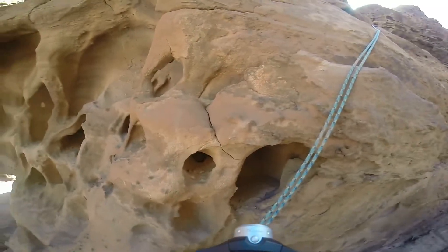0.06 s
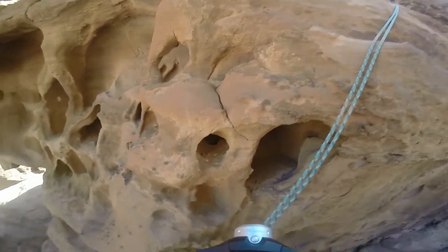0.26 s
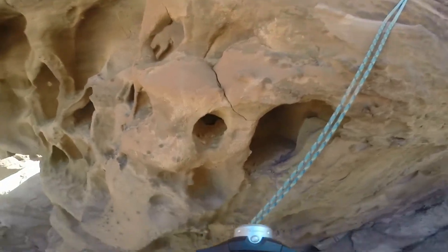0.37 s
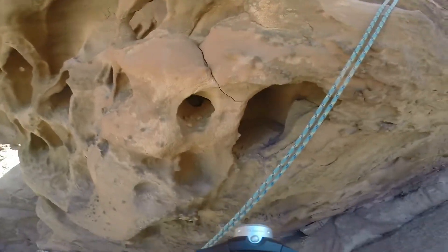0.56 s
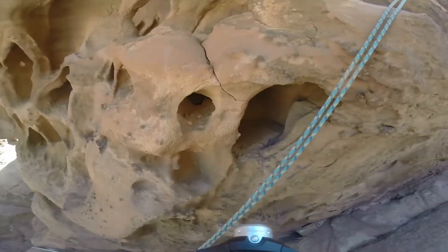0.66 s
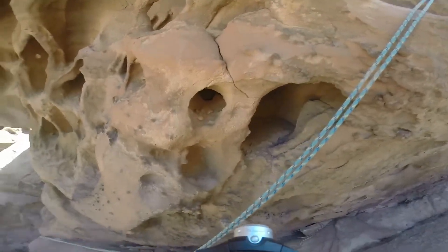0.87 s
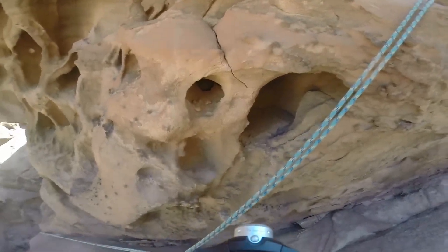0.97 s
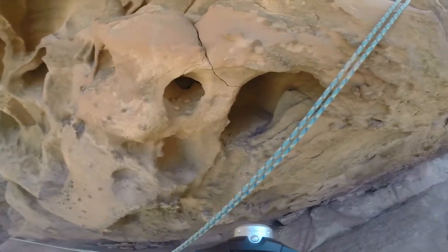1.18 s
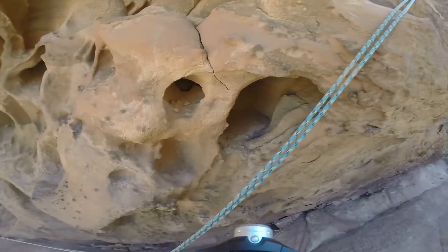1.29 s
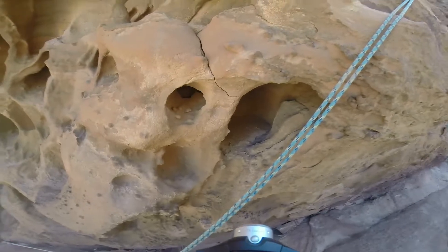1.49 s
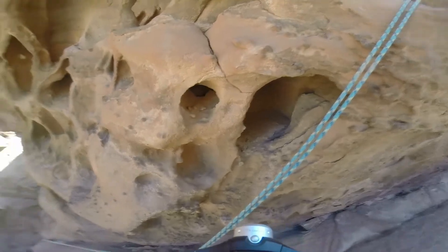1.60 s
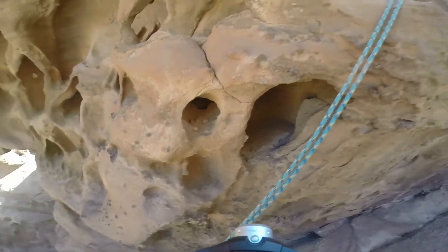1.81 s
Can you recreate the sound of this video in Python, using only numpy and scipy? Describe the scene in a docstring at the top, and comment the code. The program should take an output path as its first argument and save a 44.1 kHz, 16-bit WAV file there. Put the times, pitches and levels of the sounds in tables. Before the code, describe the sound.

Sharp plastic clacks from gear bumping a camera mount, over gritty cloth rubbing and low handling thuds

```python
"""Three chattering knocks of gear on a camera's plastic housing, plus four lone contacts, on a rock face.
Each contact rings modes of the housing, cracks as decaying noise and thumps the mount; jolts add swings.
Between them rope and clothing rub: clumped grains, hissing scrapes, gritty ticks and a short wavering hum.
Soft bumps and a muffled rumble of the swaying mount are shaped low noise, over a faint floor of air."""
import sys
import numpy as np
from scipy import signal
from scipy.fft import rfft, irfft, next_fast_len
from scipy.io import wavfile
from scipy.ndimage import uniform_filter1d, map_coordinates

SR = 44100
rng = np.random.default_rng(int(sys.argv[2]) if len(sys.argv) > 2 else 0)


def digitize_waveform(pressure):
    """Quantize a signal to 16-bit integers and store it at the path in sys.argv[1].

    Rows of a 2-D input are taken as channels; values are limited to [-1, 1].
    """
    field = np.atleast_2d(pressure).T
    bounded = np.clip(field, -1, 1)
    quanta = np.round(bounded * 32767).astype(np.int16)
    wavfile.write(sys.argv[1], SR, quanta)


N = 81585


def amp(db):
    """Decibels to gain."""
    return 10 ** (np.asarray(db) / 20)


def unit(x):
    """Scale to rms 1."""
    return x / np.sqrt(np.mean(x ** 2) + 1e-20)


def noise():
    """White noise, rms about 1."""
    return rng.standard_normal(N)


def level(rows):
    """Gain per sample, interpolated in dB between (time [s], level [dB]) rows."""
    time_s, level_db = np.transpose(rows)
    return amp(np.interp(np.arange(N) / SR, time_s, level_db))


def filtered(x, response):
    """Multiply the spectrum of x by response(hz), zero-padded against wrap-around."""
    size = next_fast_len(N + 8192)
    spectrum = rfft(x, size) * response(np.fft.rfftfreq(size, 1 / SR))
    return irfft(spectrum, size)[:N]


def coloured(x, points):
    """x shaped by (frequency [Hz], gain [dB]) points on a log frequency axis, at rms 1."""
    point_hz, point_db = np.transpose(points)
    return unit(filtered(x, lambda hz: amp(np.interp(np.log(hz + 1), np.log(point_hz), point_db))))


def since(start_s):
    """Seconds since start_s, zero before."""
    return np.maximum(np.arange(N) / SR - start_s, 0)


def ring(t, hz, t60_s):
    """One mode: a sine falling 60 dB in t60_s."""
    return np.sin(2 * np.pi * hz * t) * amp(-60 * t / t60_s)


def swells(rows):
    """Sum of Gaussian strokes; each peaks at its time and has sigma = length / 2."""
    t = np.arange(N) / SR
    return sum(amp(db) * np.exp(-2 * ((t - peak_s) / length_s) ** 2) for peak_s, length_s, db in rows)


def wander(points_per_s):
    """Smooth random curve through normal values, points_per_s of them a second."""
    return map_coordinates(rng.standard_normal(size=2000), [np.arange(N) * points_per_s / SR])


# gear on housing: (time [s], kind, level [dB], brightness [Hz], crack [dB re level], thump [dB re level])
CONTACTS = [(0.0182, "clink", -17.5, 2250, -41, -17.5), (0.1983, "clack", -17.5, 2600, -30, -35),
            (0.2011, "clink", -19.5, 2600, -25, -7), (0.2085, "clack", -8.5, 4500, -8.5, -42),
            (0.2117, "clack", -2, 2670, -14, -10.5), (0.2156, "clack", -11.5, 2350, -34, -48),
            (0.2195, "clack", -17, 1940, -26, -46), (0.605, "tock", -36, 1670, -9, 3),
            (0.874, "clack", -35, 2360, -7, -25), (0.9687, "tock", -9, 2200, -24.5, -20.5),
            (0.9725, "tock", -27, 1870, -36, -22), (0.9761, "tock", -23.5, 1670, -31, 0.5),
            (1.292, "clack", -33.5, 2520, -13, -16.5), (1.4927, "clink", -12.5, 2580, -41, -12),
            (1.49545, "clink", -9, 4180, -9, -9.5), (1.4982, "clink", -20, 3570, -5.5, -3),
            (1.5008, "clink", -8.5, 2150, -40, -29)]
# grit catching under the rope: (time [s], level [dB])
GRIT_TICKS = [(0.067, -27), (0.086, -24.5), (0.178, -37.5), (.329, -39), (.358, -34), (.8948, -26.5),
              (0.9098, -20.5), (0.9139, -20.5), (1.001, -28), (1.062, -25), (1.108, -29.5), (1.699, -28)]
TICK_BRIGHT_HZ, TICK_CRACK_DB, TICK_THUMP_DB = 2580, -24, -17.5
# housing modes by kind, hard clack, dull tock, bright clink, gritty tick: (frequency [Hz], level [dB], t60 [s])
HOUSING_MODES = {"clack": [(483, -11.5, 0.02), (624, -20, 0.017), (737, -20.5, 0.034), (1045, -12.5, 0.019),
                 (1333, -3, 0.014), (1650, -1.5, 0.027), (1839, -12, 0.051), (2147, 0.5, 0.02),
                 (2610, -17.5, 0.047), (2846, -10, 0.019), (3156, -9.5, 0.0084), (4220, -11, 0.0067),
                 (5950, -5.5, 0.0071)], "tock": [(467, -18.5, 0.069), (1010, -0.5, 0.018), (1570, -8, 0.01),
                 (1830, -11.5, 0.029), (2080, -5, 0.0086), (2590, -6.5, 0.02), (3520, -22, 0.015)],
                 "clink": [(403, -21, 0.01), (562, -17.5, 0.023), (984, -11.5, 0.027), (1347, -8.5, 0.016),
                 (1620, -11, 0.028), (1777, -10.5, 0.022), (2217, 3.5, 0.012), (2486, -16, 0.027),
                 (3430, -17.5, 0.02), (4417, -17.5, 0.016), (5415, -9.5, 0.011)],
                 "tick": [(1290, -18.5, 0.016), (1810, -12, 0.012), (2170, 1, 0.018), (2388, -6, 0.021)]}
# crack spectrum: (frequency [Hz], gain [dB])
CRACK_COLOUR = [(200, 12.5), (1000, 6), (2500, 1.5), (3600, -9), (5500, 2.5), (8000, -15.5), (11000, -13.5),
                (15500, -46)]
CRACK_T60_S, CONTACT_ATTACK_S = 0.016, 0.00066
CRACK_CUTOFF_RATIO = 1.6  # lowpass cutoff / contact brightness
MOUNT_HZ, MOUNT_T60_S = 203.6, 0.079


def knocks():
    """Each contact excites housing modes, a noise crack and the mount; lower brightness dulls high modes."""
    out = np.zeros(N)
    grit = coloured(noise(), CRACK_COLOUR)
    ticks = [(s, "tick", db, TICK_BRIGHT_HZ, TICK_CRACK_DB, TICK_THUMP_DB) for s, db in GRIT_TICKS]
    for start_s, kind, db, bright_hz, crack_db, thump_db in CONTACTS + ticks:
        start = int(start_s * SR)
        span = slice(start, start + SR // 6)
        t = since(start_s)[span]
        shell = np.zeros(len(t))
        for k, (hz, mode_db, t60_s) in enumerate(HOUSING_MODES[kind]):
            dulling = 1 / np.sqrt(1 + (hz / bright_hz) ** 4)
            shell += (-1) ** k * amp(mode_db) * dulling * ring(t, hz, t60_s)
        cutoff_hz = min(CRACK_CUTOFF_RATIO * bright_hz, SR / 2 - 1)
        b, a = signal.butter(1, cutoff_hz, fs=SR)
        crack = amp(crack_db) * signal.lfilter(b, a, grit[span]) * amp(-60 * t / CRACK_T60_S)
        thump = amp(thump_db) * ring(t, MOUNT_HZ, MOUNT_T60_S)
        attack = 1 - np.exp(-t / CONTACT_ATTACK_S)
        out[span] += amp(db) * (shell + crack + thump) * attack
    return out


# mount swings: (time [s], level [dB], frequency [Hz], rise [s], pitch sag [1/s, sign ignored])
JOLTS = [(0.21, -21.5, 107, 0.0099, 4), (0.226, -20.5, 42.5, 0.017, -1.5), (0.968, -33.5, 257.7, 0.013, 34),
         (1.494, -19, 75.2, 0.02, -1), (1.520, -10.5, 34.3, 0.016, -2)]


def jolts():
    """A jolt swings the mount: a sine peaking after its rise time, its pitch sagging as it dies."""
    out = np.zeros(N)
    for start_s, db, hz, rise_s, sag_per_s in JOLTS:
        t = since(start_s)
        pitch_hz = (t > 0) * hz / (1 + abs(sag_per_s) * t)
        turns = np.cumsum(pitch_hz) / SR
        envelope = t / rise_s * np.exp(0.5 * (1 - (t / rise_s) ** 2))  # peak 1
        out += amp(db) * envelope * np.sin(2 * np.pi * turns)
    return out


# rubbing strength, before RUB_TRIM_DB: (time [s], level [dB])
RUB = [(0, -46.5), (.09, -38.5), (.104, -59), (.25, -49), (.308, -58), (.345, -43), (.40, -46), (.474, -58),
       (.55, -40), (.598, -51.5), (.62, -48), (.71, -53.5), (.788, -61.5), (.828, -42.5), (.864, -51.5),
       (.916, -34), (.942, -57), (.959, -32.5), (.988, -51.5), (1.004, -45), (1.07, -38.5), (1.127, -49.5),
       (1.155, -42), (1.19, -53.5), (1.298, -46.5), (1.335, -55.5), (1.40, -47), (1.448, -54.5),
       (1.486, -33.5), (1.53, -52.5), (1.576, -42), (1.628, -50.5), (1.692, -45.5), (1.704, -35),
       (1.77, -47), (1.785, -70), (1.803, -46.5), (1.85, -38)]
# rubbing spectrum: (frequency [Hz], gain [dB])
RUB_COLOUR = [(100, -26), (230, -1), (330, -30), (500, -1), (640, -14.5), (1000, -0.5), (1130, -7),
              (1260, 3.5), (1450, -6.5), (1780, 4), (2230, 7), (2450, -1), (2650, -4.5), (3100, -24.5),
              (4200, -31), (5500, -22), (15000, -82)]
RUB_TRIM_DB, RUB_TOP_HZ = -0.5, 9000  # top: -6 dB point
GRAINS_PER_S, GRAIN_SPREAD_DB, SMOOTH_DB = 1900, 1, 2  # smooth noise re grains
CLUMPS_PER_S, CLUMP_SPREAD_DB = 150, 2.5


def rubbing():
    """Cloth and rope slip in dense grains over smooth friction noise, in clumps, through the housing."""
    is_grain = rng.random(N) < GRAINS_PER_S / SR
    slips = is_grain * noise() * amp(GRAIN_SPREAD_DB * noise())
    friction = unit(slips) + amp(SMOOTH_DB) * noise()
    clumped = friction * amp(CLUMP_SPREAD_DB * wander(CLUMPS_PER_S))
    heard = filtered(coloured(clumped, RUB_COLOUR), lambda hz: 1 / (1 + (hz / RUB_TOP_HZ) ** 4))
    return amp(RUB_TRIM_DB) * level(RUB) * heard


# light rope strokes: (peak time [s], length [s], level [dB])
SCRAPES = [(0.05, 0.037, -61.5), (0.912, 0.013, -54), (1.401, 0.055, -64), (1.486, 0.01, -51),
           (1.712, 0.015, -51), (1.742, 0.031, -57.5), (1.83, 0.051, -66)]
# scrape spectrum: (frequency [Hz], gain [dB])
SCRAPE_COLOUR = [(1500, -26), (3000, 1), (4200, -4), (5700, -0.5), (7200, -16.5), (11000, -15),
                 (15000, -45)]


def scrapes():
    """Light strokes of the rope: shaped noise hiss that swells and fades."""
    return swells(SCRAPES) * coloured(noise(), SCRAPE_COLOUR)


# drags of gear: (peak time [s], length [s], level [dB])
DRAGS = [(1.048, 0.026, -41), (1.098, 0.029, -45.5)]
# low resonances under a drag: (frequency [Hz], level [dB])
HUM_MODES = [(210, 0), (505, -8)]
HUM_WAVER_RATIO, WAVER_POINTS_PER_S = 0.0253, 45  # pitch deviation / pitch


def hum():
    """Dragging gear keeps low resonances ringing; each pitch wavers at random."""
    out = np.zeros(N)
    for hz, db in HUM_MODES:
        pitch_hz = hz * (1 + HUM_WAVER_RATIO * wander(WAVER_POINTS_PER_S))
        out += amp(db) * np.sin(2 * np.pi * np.cumsum(pitch_hz) / SR)
    return swells(DRAGS) * out


# body against mount: (time [s], level [dB], fade time constant [s])
BUMPS = [(0.212, -35, 0.021), (0.337, -47, 0.082), (0.604, -41, 0.071), (0.801, -45.5, 0.097),
         (0.976, -34, 0.015), (1.037, -41, 0.052), (1.304, -51.5, 0.084), (1.516, -39.5, 0.04)]
# bump spectrum: (frequency [Hz], gain [dB])
BUMP_COLOUR = [(60, -14), (125, 9.5), (165, -27), (215, 5.5), (330, -12.5), (490, -10), (750, -14.5),
               (1300, -62), (4000, -62)]
BUMP_RISE_S = 0.0025


def bumps():
    """Padded pushes of the body: low shaped noise with a fast rise and exponential fade."""
    push = np.zeros(N)
    for start_s, db, fade_s in BUMPS:
        t = since(start_s)
        push += amp(db) * (1 - np.exp(-t / BUMP_RISE_S)) * np.exp(-t / fade_s)
    return push * coloured(noise(), BUMP_COLOUR)


# shaking strength: (time [s], level [dB])
SWAY = [(0, -37), (.06, -33), (.14, -46.5), (.26, -31.5), (.33, -40), (.385, -28.5), (.46, -37), (.77, -44),
        (.85, -31), (1.01, -27.5), (1.2, -46.5), (1.31, -31.5), (1.42, -39.5), (1.56, -27), (1.79, -39.5),
        (1.85, -29.5)]
# shaking spectrum: (frequency [Hz], gain [dB])
SWAY_COLOUR = [(10, -8), (25, 7), (45, 2), (70, -6), (110, -17), (160, -26), (215, -19.5), (300, -28),
               (600, -93), (2000, -140)]


def rumble():
    """The climber's movement shakes the mount: low noise, evened to its local rms, follows the strength."""
    shake = coloured(noise(), SWAY_COLOUR)
    local_power = np.abs(uniform_filter1d(shake ** 2, size=2600))  # 59 ms window
    steady = shake / np.sqrt(local_power + 1e-6)
    return level(SWAY) * steady


# air spectrum: (frequency [Hz], gain [dB])
AIR_COLOUR = [(50, 13.5), (220, -3), (400, 3.5), (2200, -8), (3500, -6.5), (6000, -14.5), (10000, -14),
              (15000, -25.5)]
AIR_DB = -61.5


def air():
    """Still outdoor air: a steady floor of shaped noise."""
    return amp(AIR_DB) * coloured(noise(), AIR_COLOUR)


def scene():
    """All handling sounds summed over the air, one channel."""
    handling = knocks() + jolts() + rubbing() + scrapes() + hum() + bumps() + rumble()
    return (handling + air())[None]


TOP_HZ = 15700


def record(dry):
    """The camera clips at full scale, then removes everything from TOP_HZ up."""
    clipped = np.clip(dry[0], -1, 1)
    return filtered(clipped, lambda hz: hz < TOP_HZ)[None]


dry = scene()
out = record(dry)
digitize_waveform(out)
```